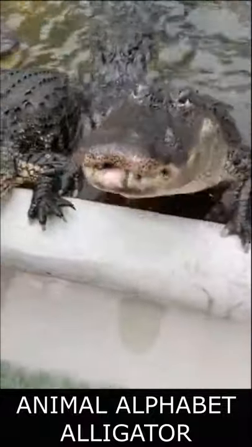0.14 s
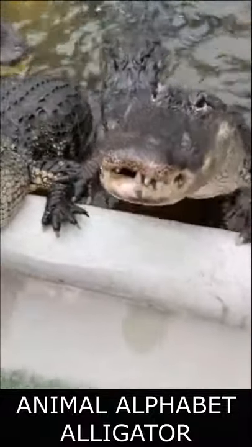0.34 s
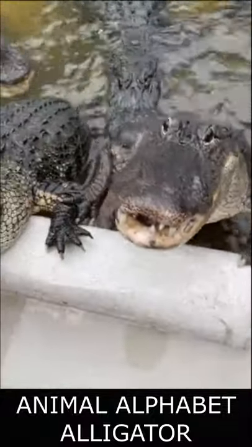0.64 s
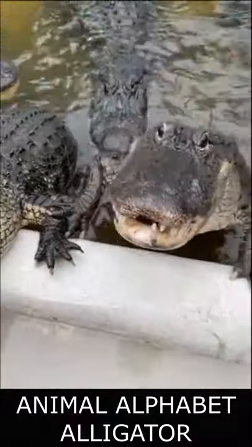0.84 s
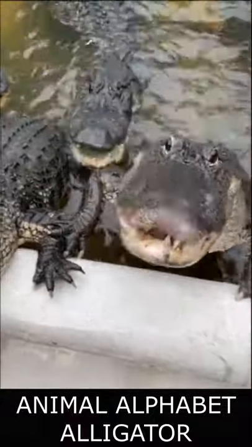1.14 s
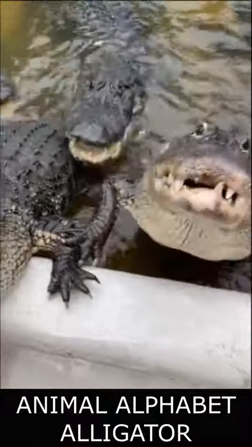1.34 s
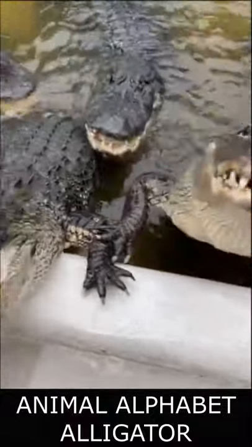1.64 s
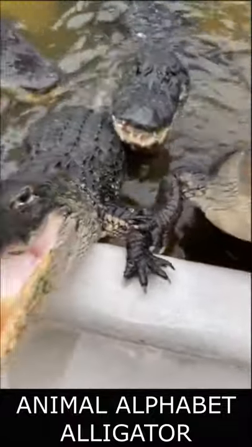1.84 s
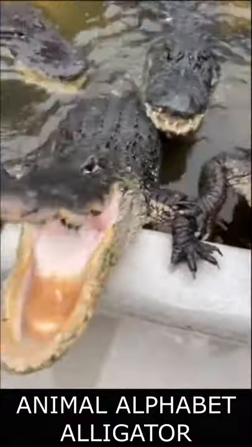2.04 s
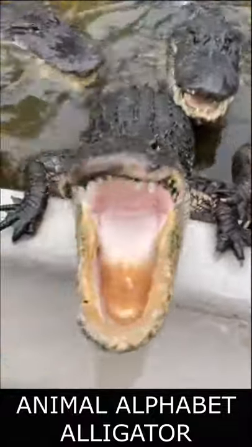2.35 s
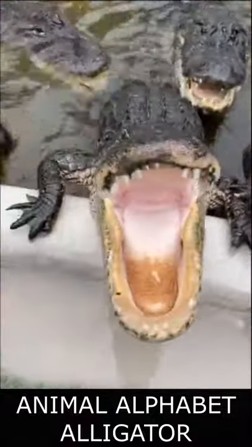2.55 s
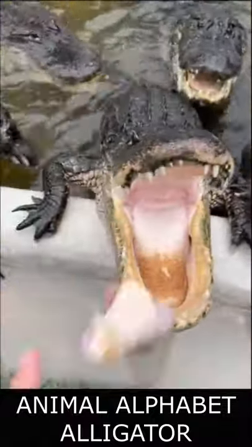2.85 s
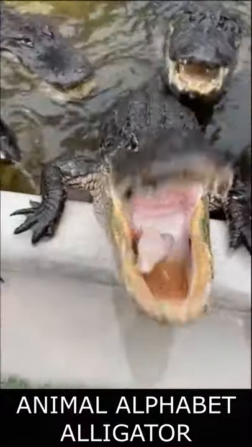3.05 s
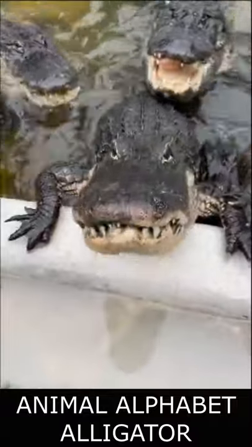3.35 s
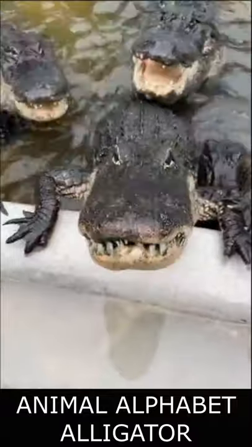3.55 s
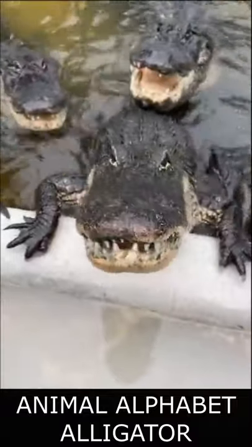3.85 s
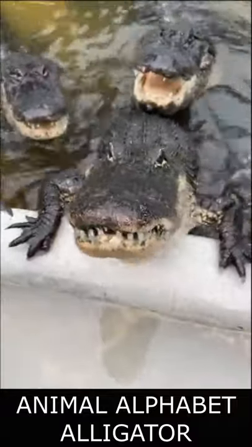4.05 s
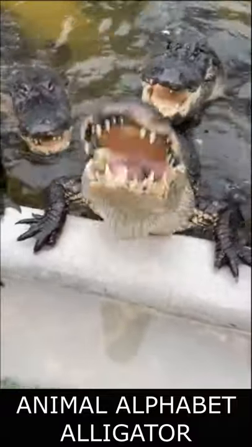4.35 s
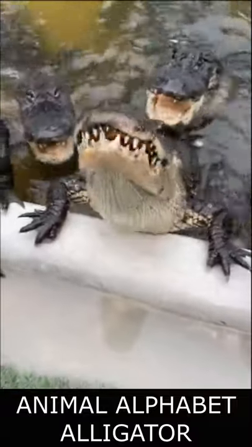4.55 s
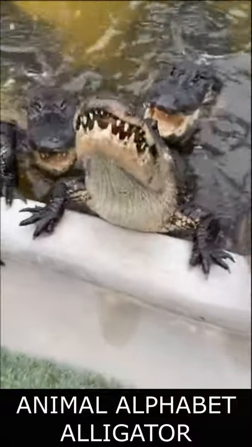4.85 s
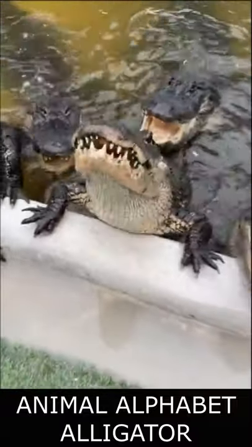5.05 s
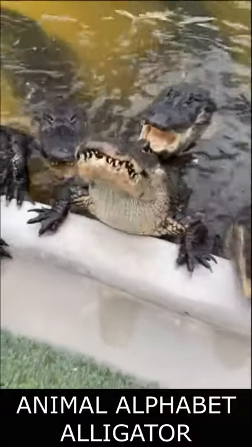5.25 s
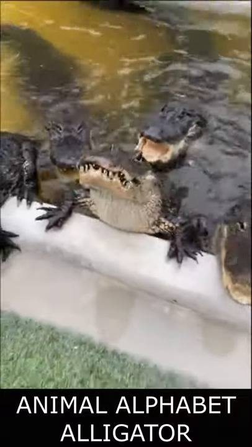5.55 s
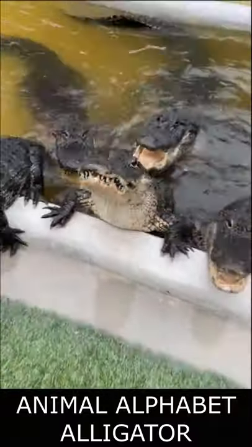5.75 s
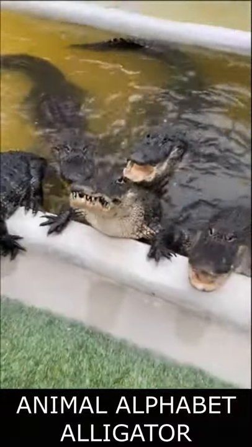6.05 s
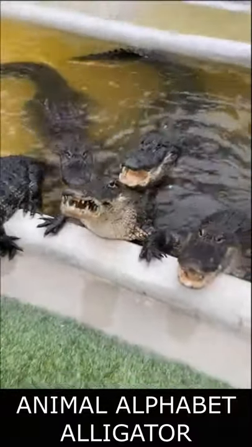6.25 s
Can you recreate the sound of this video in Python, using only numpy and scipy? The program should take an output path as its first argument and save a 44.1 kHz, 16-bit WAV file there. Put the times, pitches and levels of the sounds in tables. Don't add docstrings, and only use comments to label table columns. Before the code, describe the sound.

Alligator jaws snap shut twice with toothy cracks, followed by busy sloshing, dripping and bubbling at a pond edge, faint bird whistles far off.

```python
import sys
import numpy as np
from scipy import signal
from scipy.fft import rfft, irfft, next_fast_len
from scipy.io import wavfile
from scipy.ndimage import uniform_filter1d, minimum_filter1d

SR = 44100
rng = np.random.default_rng(int(sys.argv[2]) if len(sys.argv) > 2 else 0)


def unload_wav(signal):
    wavfile.write(
        sys.argv[1],
        SR,
        np.round(np.clip(np.atleast_2d(signal).T, -1, 1) * 32767).astype(np.int16),
    )


def gain_from_db(level_db):
    decades = np.asarray(level_db, float) / 20
    return 10 ** decades


N = 282681

# (frequency [Hz], density [dB per Hz])
SPRAY = [(880, -2.5), (1500, -3), (2410, -6), (4500, -5.5), (4820, -4), (5220, -4), (7030, -3),
         (8570, -7.5), (9000, -22.5), (9840, -6), (11000, -0.5), (12700, -13), (16000, -43)]
# (time [s], peak level [dB], pitch [Hz])
DRIPS = [(0.748, -32, 2370), (1.012, -29, 1368), (1.334, -25, 2430), (1.47, -23, 1270),
         (1.608, -27.5, 1960), (1.699, -28.5, 2480), (1.832, -25, 1830), (1.892, -23, 1310),
         (1.912, -28, 1280), (1.942, -15, 1210), (2.097, -22, 2580), (2.236, -32, 2260), (2.418, -33, 1440),
         (2.722, -32, 1340), (3.154, -29.5, 2550), (3.408, -23.5, 2300), (3.43, -19, 2120),
         (3.576, -24, 1270), (3.659, -21.5, 1720), (3.696, -23, 2420), (3.914, -33, 2160),
         (4.198, -23, 1346), (4.339, -25, 1270), (4.486, -33, 1575), (5.493, -25.5, 1530),
         (5.597, -29.5, 1590), (5.83, -32, 1580), (5.883, -30, 1400), (6.062, -28, 1660)]


def jaw_claps():
    # (time [s], level [dB], pitch at closing [Hz], settled pitch [Hz], t60 [s])
    hollows = [
        (0.0012, -23, 120, 121, 0.13),
        (.0185, -22.5, 930, 610, 0.021),
        (.04, -20, 1180, 950, 0.042),
        (0.0375, -3, 756, 243, 0.044),
        (.039, -7.5, 100, 149, 0.041),
        (0.3048, -16, 438, 550, 0.021),
        (0.3054, -16, 506, 760, 0.036),
        (0.324, -16.5, 544, 258, 0.042),
    ]
    # (time [s], level [dB], rise [s], t60 [s], centre frequency [Hz])
    cracks = [(0.0, -34, .002, 0.19, 5000), (0.015, -16, .0015, 0.029, 6860),
              (0.0159, -13.5, 0.0012, 0.041, 1580), (0.22, -30.5, 0.0014, 0.024, 3200),
              (0.324, -31, 0.021, 0.28, 2140), (0.021, -19, 0.0086, 0.056, 9000),
              (0.0369, -7, 0.0003, 0.0058, 8500), (0.038, -10.5, 0.00094, 0.023, 11400),
              (.299, -30, .001, 0.022, 2500), (0.302, -11.5, 0.00062, 0.019, 5700),
              (0.302, -16, 0.0006, 0.029, 1820), (0.3215, -10, 0.0012, 0.019, 4270)]
    # (frequency [Hz], gain [dB])
    port_colour = [(2500, 0.5), (4500, -5), (7000, 0.5), (9000, -6), (11000, 5), (12800, -4), (14800, -19)]
    jaws = np.zeros((2, N))
    for s, *ring in hollows:
        add(jaws, s, hollow(*ring))
    for s, *burst in cracks:
        add(jaws, s, crack(*burst))
    return colour(jaws, port_colour) * gain_from_db(np.array([[-.2], [.2]]))


def hollow(db, start_hz, end_hz, t60):
    t = np.arange(round(.25 * SR)) / SR
    hz = end_hz + (start_hz - end_hz) * np.exp(-t / 0.0025)
    rise = 1 - np.exp(-t * start_hz / 0.16)
    return gain_from_db(db - 60 * (t / t60) ** 1.35) * rise * np.sin(2 * np.pi * np.cumsum(hz) / SR)


def crack(db, rise, t60, hz, froth=0):
    t = np.arange(round(max(.05, .6 * t60) * SR)) / SR
    rough = rng.standard_normal(len(t)) + np.resize(froth, len(t))
    noise = evened(band(rough, hz / 2.97, min(hz * 1.45, 13000)))
    fade_out = signal.windows.tukey(2 * len(t), .3)[len(t):]
    return gain_from_db(db - 3.0 - 60 * t / t60) * (1 - np.exp(-t / rise)) * noise * fade_out


def splashes():
    # (time [s], level [dB], rise [s], t60 [s], centre frequency [Hz])
    sheets = [(.05, -30, 0.015, 0.69, 150), (.33, -27.5, 0.011, 0.39, 330), (.95, -34.5, 0.094, 0.87, 440),
              (2.52, -34, 0.027, 0.41, 3500), (2.8, -39.5, 0.065, 0.51, 290), (2.3, -36.5, 0.11, 1.13, 520),
              (3.85, -36.5, 0.056, 0.57, 380), (4.4, -33.5, .04, 0.6, 320), (4, -35, .03, 0.65, 310),
              (4.88, -31.5, .04, 0.59, 1170), (.5, -35, 0.045, 0.86, 480), (1.96, -24, 0.018, 0.27, 400),
              (4.114, -19.5, 0.014, 0.38, 730), (4.345, -25.5, 0.069, 0.47, 6500),
              (4.971, -32.5, 0.035, 0.43, 650), (3.53, -28, 0.025, 0.55, 1080), (4.6, -33, 0.06, 0.71, 300),
              (5.8, -34, 0.029, 0.55, 1300), (1.78, -33.5, 0.034, 0.67, 2200),
              (3.8382, -17, .0005, .016, 3300), (3.8445, -22, .0015, .03, 3100),
              (3.832, -24, .001, .016, 1700), (3.298, -23, .002, .045, 4300)]
    # (time [s], peak level [dB], burst t60 [s], level under 3 kHz [dB])
    slaps = [(0.7472, -30, 0.043, -25), (1.26, -24, 0.021, 7), (1.3701, -28.5, 0.2, 2.5),
             (1.4313, -22.5, 0.18, -17), (1.47, -21.5, 0.03, -19), (1.595, -27, 0.036, -1),
             (1.7235, -22.5, 0.064, -20), (1.7897, -25, 0.25, -5), (1.8687, -18.5, 0.049, -25),
             (1.962, -28, 0.08, 9), (1.9895, -14, 0.03, 3.5), (2.17, -27.5, 0.029, -22),
             (2.3431, -19.5, 0.012, 2.5), (2.9972, -23, 0.019, 4.5), (3.0304, -29.5, 0.13, -1),
             (3.101, -25, 0.047, -19), (3.1356, -24.5, 0.052, -14), (3.2997, -20, 0.036, -15.5),
             (3.5343, -27.5, 0.42, 3.5), (3.67, -22.5, 0.093, 1.5), (3.8388, -18, 0.02, 1),
             (4.0414, -31, 0.25, 4.5), (4.1918, -24.5, 0.034, 3), (4.2092, -23.5, 0.083, 5),
             (5.2815, -33, 0.033, 7.5), (5.37, -23.5, 0.03, -27), (5.9102, -16.5, 0.048, -32),
             (5.9936, -20.5, 0.066, -16), (6.066, -19, 0.023, 3), (6.284, -27, 0.074, -9)]
    # (time [s], peak level [dB], level under 3 kHz [dB])
    flecks = [(0.2004, -39, -8), (0.4299, -28, -12), (0.5048, -33, -12), (0.614, -27, -11),
              (0.9597, -33, -7), (1.1772, -28, -2), (1.222, -31, 1), (1.5773, -22.5, -7),
              (1.8176, -23, -10), (1.8347, -14.5, -9), (1.9415, -21, -3), (2.007, -22, -3),
              (2.2697, -37, -12), (2.3141, -29, 0), (2.4488, -27, -15), (2.5903, -23, -11),
              (3.047, -22, -6), (3.263, -31, 0), (3.313, -30, -11), (3.334, -30, -10), (3.495, -32, 3),
              (3.6326, -29, 5), (3.7948, -30, -11), (3.8314, -21, -1), (3.9162, -24, -7),
              (3.9679, -26, -12), (4.2403, -25, -12), (4.2986, -35, -4), (4.4855, -20, -7),
              (4.6209, -27, -6), (4.781, -28, -11), (5.353, -28, -12), (5.5722, -28, -10),
              (6.0174, -26, -5), (6.0432, -21, -8), (6.2687, -34, -13)]
    water = np.zeros((2, N))
    froth = 0.4 * swarm(339.3, 3450, 1200, 4.4, 3.4, count=10)
    for s, *burst in sheets:
        add(water, s, crack(*burst, froth=froth[round(s * SR):]))
    for s, *burst in slaps:
        add(water, s - .001, slap(*burst))
    for s, db, low_db in flecks:
        add(water, s - .001, slap(db - 4, t60=0.033, low_db=low_db - 2))
    for s, db, _ in DRIPS:
        add(water, s - .002, slap(db - 8, t60=.014, low_db=6.0))
    return water


def slap(db, t60, low_db):
    t = np.arange(round(.15 * SR)) / SR
    noise = rng.standard_normal((3, len(t)))
    high = evened(colour(noise[0] + 0.14 * np.array([noise[1], -noise[1]]), SPRAY))
    low = evened(band(noise[2], 690, 3000))
    tick = 1.3 * gain_from_db(-60 * t / 0.018)
    shape = (gain_from_db(-60 * t / max(t60, .005)) + tick) * (1 - np.exp(-t / 0.0015))
    return gain_from_db(db - 10.5) * shape * (high + gain_from_db(low_db) * low)


def trapped_bubbles():
    # (time [s], peak level [dB], pitch [Hz], length [cycles], pitch rise [share])
    gulps = [(0.989, -31, 326, 10.3, 0.67), (1.258, -32, 129, 3.9, 0.2), (1.374, -26, 550, 1.5, -0.12),
             (1.74, -31, 291, 11, 0.47), (1.9945, -15.5, 140, 5, 0.5), (2.014, -16, 308, 3.8, 0.087),
             (3.167, -31.5, 205, 3.2, 0.27), (3.538, -24, 570, 7, -0.1), (3.524, -24.5, 900, 15, .4),
             (3.87, -26.5, 267, 3.2, 0.88), (4.124, -24, 135, 3, 0.1), (4.118, -28, 530, 4, 0.5),
             (4.186, -24, 343, 7.7, 0.19), (4.413, -14, 975, 12.6, 0.23), (4.79, -25, 254, 5.9, 0.29),
             (4.809, -27.5, 228, 7, 0.86), (4.827, -23.5, 370, 7.7, 0.07), (.829, -31, 880, 24, -.07),
             (1.579, -24, 734, 10.8, -0.094), (3.002, -19.5, 847, 11.6, -0.07),
             (3.067, -26.5, 550, 2.2, -0.0033), (3.354, -37, 582, 16, -0.064), (1.386, -24, 270, 2.2, .1),
             (2.68, -37.5, 340, 6, 0.14), (1.09, -36, 734, 17, -0.02), (2.107, -34, 130, 3, 0.16),
             (4.292, -31, 363, 4.3, .2), (4.995, -33, 420, 5.5, 0.37), (4.222, -30, 330, 7, .15),
             (4.452, -29, 190, 4, .2)]
    # (time [s], peak level [dB], pitch [Hz])
    plops = [(0.409, -29, 670), (1.178, -35, 827), (1.275, -22, 1137), (1.356, -33, 997),
             (1.76, -27.5, 947), (1.872, -29, 820), (1.964, -26, 530), (1.989, -17, 910),
             (2.022, -26, 1010), (2.342, -30, 950), (2.376, -15.5, 770), (2.4, -33, 707),
             (2.797, -36, 1140), (2.887, -32.5, 735), (3.859, -25, 986), (4.123, -19, 600),
             (4.133, -24.5, 940), (4.16, -22.5, 627), (2.765, -31, 1110), (4.926, -27, 950),
             (5.459, -36, 433), (5.46, -30.5, 966), (5.978, -29.5, 1126)]
    # (time [s], peak level [dB], pitch [Hz])
    blips = [(0.56, -34, 480), (0.638, -34, 641), (1.833, -32, 977), (2.237, -36, 886), (2.28, -36, 700),
             (2.589, -40, 530), (2.614, -34, 860), (2.949, -35, 1000), (3.432, -35, 630),
             (3.499, -34.5, 595), (3.576, -28.5, 668), (3.648, -35, 579), (3.729, -36, 930),
             (3.914, -32, 966), (4.038, -33, 594), (4.082, -31, 635), (4.2, -29.5, 553), (4.261, -34, 525),
             (4.722, -34, 619), (4.956, -29, 950), (5.036, -30.5, 896), (5.281, -34.5, 597),
             (5.807, -35, 684), (6.022, -32, 880), (6.147, -38, 929),
             (0.5965, -33, 2420), (0.7203, -39, 1430), (0.9193, -38, 2450), (1.2251, -35, 1170),
             (1.3567, -26, 2370), (1.429, -31, 1370), (1.454, -30, 1320), (1.734, -31, 1550),
             (1.787, -26, 2670), (1.8745, -28, 1310), (1.964, -23, 2240), (2.0203, -25, 1460),
             (2.5526, -29, 2700), (2.5835, -32.5, 1420), (2.9342, -33, 1370), (3.1298, -29, 2410),
             (3.2335, -35, 2650), (3.4526, -26, 2350), (3.6112, -28, 1720), (3.7064, -28, 1630),
             (3.7747, -31, 2580), (3.924, -27, 2120), (3.9463, -31, 2360), (3.9679, -34, 1410),
             (4.0455, -34, 1850), (4.0951, -30, 1250), (4.2214, -23, 2130), (4.236, -27, 2310),
             (4.2931, -30, 2430), (4.3564, -27, 2430), (4.429, -25.5, 2200), (4.6219, -31.5, 2380),
             (4.8334, -29, 1630), (4.9043, -32, 1210), (5.1272, -35.5, 1390), (5.3007, -32.5, 2400),
             (5.3537, -31.5, 2520), (5.5254, -34, 2720), (5.7635, -32.5, 1170), (5.851, -30, 1710),
             (6.07, -29, 1660), (6.2836, -33, 2250)]
    hard_db, hard_cycles, cycles_per_db, cycles_per_khz = -20, 6.8, 0.55, 0.9
    placed = list(gulps)
    for s, db, hz in plops + DRIPS:
        cycles = hard_cycles + cycles_per_db * (hard_db - db) + cycles_per_khz * hz / 1000
        placed.append((s, db, hz, cycles))
    for s, db, hz in blips:
        placed.append((s, db, hz, 8.2 + cycles_per_khz * hz / 1000, .08))
    water = np.zeros((2, N))
    for s, db, *size in placed:
        pan_db = rng.normal(-.5, 2.6) * min(size[0] / 900, 1)
        gain = gain_from_db(db - 3.5 + pan_db * np.array([[.5], [-.5]]))
        add(water, s - .0015, gain * bubble(*size))
    return water


def bubble(hz, cycles, rise=0.11):
    u = np.linspace(0, 1, int(max(cycles, 1.5) * 1.606 / hz * SR))
    shape = (1 - np.exp(-u / .2)) ** 1.6 * np.exp(-3.8 * u) * (1 - u ** 4)
    phase = 2 * np.pi * np.cumsum(hz * (1 + rise * (2 * u - .4))) / SR
    return shape / shape.max() * np.sin(phase)


def air_pockets():
    # (time [s], length [s], first pitch [Hz], last pitch [Hz], level [dB])
    pockets = [(.125, .055, 215, 190, -37), (0.198, .035, 640, 700, -48), (.248, 0.04, 830, 900, -48),
               (.345, 0.077, 268, 196, -34), (0.518, 0.18, 213, 319, -38), (.58, 0.27, 164, 262, -41),
               (.956, 0.041, 466, 523, -42), (1.012, 0.037, 1250, 2060, -36.5),
               (1.033, 0.072, 484, 758, -45.5), (1.372, .055, 590, 530, -33.5),
               (4.551, .056, 180, 430, -29), (4.597, 0.022, 385, 420, -24), (4.655, .03, 170, 380, -32),
               (5.406, .046, 278, 261, -33), (5.441, 0.047, 310, 660, -35), (5.478, 0.05, 770, 740, -37),
               (5.776, .045, 380, 640, -38), (6.306, .035, 690, 876, -41), (2.728, .045, 780, 1200, -45.5),
               (2.862, .035, 400, 780, -41), (2.893, .05, 780, 1420, -45), (2.952, .04, 1080, 720, -44),
               (1.148, .035, 520, 820, -43)]
    water = np.zeros((2, N))
    for row in pockets:
        add(water, *pocket(*row))
    return water


def pocket(s, length, first_hz, last_hz, db):
    u = np.linspace(0, 1, num=9)
    hz = first_hz * (last_hz / first_hz) ** u
    level_db = db - 15 * abs(u - 0.13)
    return glide(np.transpose([s + length * u, hz, level_db]), wobble=0.039, flutter_db=3.0)


def spray(surge):
    flicker = gain_from_db(2.24 * surge + 1.77 * evened(uniform_filter1d(rng.standard_normal(N), 90)))
    drops = swarm(1802, 13700, 2500, 5.4, 4.5, count=14)
    mix = evened(rng.standard_normal((2, N))) + .55 * np.array([drops, np.roll(drops, 900)])
    z = signal.stft(mix * flicker, nperseg=256)[2]
    patches = uniform_filter1d(rng.standard_normal(z.shape[1:]), 9, 0)
    patches = evened(uniform_filter1d(patches, 10, 1))
    mix = colour(signal.istft(z * gain_from_db(3.32 * patches), nperseg=256)[1][:, :N], SPRAY)
    return gain_from_db(stir(1) + 5.5) * evened(widen(*mix))


def gurgle(surge):
    wash = rng.standard_normal((2, N))
    small = swarm(641.6, 3890, 800, 8.9, 4.15, count=20) + 0.77 * evened(band(wash[0], 740, 3540))
    large = swarm(139, 694, 150, 5.9, 4.3, count=16) + .5 * evened(band(wash[1], 86, 650))
    small_db = stir(1) + stir(2) - 0.5
    calm_db, slosh_db = -46, -54
    large_db = slosh_db + 0.22 * (stir(1) - calm_db) + 0.59 * stir(2) - 4.0
    x = gain_from_db(small_db) * evened(small * gain_from_db(1.6 * surge))
    x += gain_from_db(large_db) * evened(large * gain_from_db(2.9 * surge))
    return widen(x, np.roll(x, 700))


def swarm(low_hz, high_hz, per_s, cycles, spread_db, count=24):
    out = np.zeros(N)
    slots = N // 8
    for hz in np.geomspace(low_hz, high_hz, count):
        chance, luck = rng.random((2, slots))
        clump = np.repeat(np.minimum(rng.exponential(1, N // 2048 + 1), 2.4), 256)[:slots]
        born = chance < clump * per_s / count / SR * 8
        size = np.zeros(N)
        where = np.arange(slots) * 8 + rng.integers(0, 8, slots)
        size[where] = gain_from_db(spread_db * np.minimum(-np.log(luck + 1e-9), 3.0)) * born
        ring = bubble(hz, cycles * rng.uniform(0.63, 2.25), rng.uniform(-0.047, 0.3))
        out += signal.oaconvolve(size, ring)[:N]
    return evened(out)


def stir(column):
    # (time [s], surface stirring [dB], trapped air above it [dB])
    stirring = [(0.08, -62, -2), (0.28, -59, 4), (0.32, -48, 5.5), (0.77, -55, 2), (1.2, -52.5, 4.5),
                (1.45, -42, -11), (1.69, -49, 3), (1.97, -39.5, 4), (2.19, -48, 2.5), (2.8, -54, 6),
                (3.1, -47.5, 2), (4.3, -42.5, 0.5), (4.58, -50, -2.5), (4.9, -45, 4.5), (5.14, -51, 4.5),
                (5.68, -50.5, 2.5), (5.95, -46.5, 4), (6.41, -51.5, -11)]
    table = np.transpose(stirring)
    return np.interp(np.arange(N) / SR, table[0], table[column])


def lapping():
    return evened(uniform_filter1d(uniform_filter1d(rng.standard_normal(N), 500), 300))


def lull():
    # (middle time [s], half width [s], depth [dB])
    lulls = [(.68, .03, -2.5), (.8, .03, -1.5), (1.14, .03, -4), (1.24, .016, -5.5), (1.55, 0.034, -2.5),
             (2.72, 0.064, -1.5), (3.275, .022, -7), (3.465, 0.026, -2), (3.82, .014, -2),
             (4.28, 0.024, -4.5), (3.365, .024, -5), (4.68, 0.059, -2), (5.05, .04, -3.5),
             (5.24, 0.027, -5), (5.51, 0.027, -4), (5.72, 0.045, -3.5), (6.23, 0.036, -2.5)]
    t = np.arange(N) / SR
    return gain_from_db(sum(db * np.exp(-((t - s) / half) ** 2) for s, half, db in lulls))


def walls(x):
    t = np.arange(round(.15 * SR)) / SR
    tail = rng.standard_normal((2, len(t))) * gain_from_db(-60 * t / 0.16) * (t > .004)
    tail += 0.89 * tail[::-1]
    return signal.oaconvolve(x, tail / np.linalg.norm(tail[0]), axes=1)[:, :N]


def far_bird():
    # (time [s], length [s], first pitch [Hz], level [dB], unsteadiness [share])
    calls = [
        (2.009, .24, 3520, -41, 0.021),
        (5.554, 0.034, 5110, -46, .02),
        (5.567, .27, 3570, -40.5, 0.0095),
    ]
    far = np.zeros((2, N))
    for row in calls:
        add(far, *whistle(*row))
    return far


def whistle(s, length, first_hz, db, wobble):
    t = np.linspace(0, length, num=30)
    rest_hz, settle_s = 2770, .09
    hz = rest_hz + (first_hz - rest_hz) * np.exp(-t / settle_s)
    level_db = db - 11.5 * (t / length) ** 2
    return glide(np.transpose([s + t, hz, level_db]), wobble, flutter_db=3.0)


def rumble():
    # (frequency [Hz], density [dB per Hz])
    drone_spectrum = [(12, -42), (20, -42.5), (48, 4.5), (73, 9), (93, 1.5), (208, -10.5), (400, -30),
                      (520, -62), (880, -120)]
    return gain_from_db(-41) * evened(colour(rng.standard_normal(N), drone_spectrum))


def glide(rows, wobble, flutter_db):
    s, hz, db = np.transpose(rows)
    t = np.arange(s[0], s[-1], 1 / SR)
    drift, flutter = evened(uniform_filter1d(rng.standard_normal((2, len(t))), 200))
    smooth_hz = uniform_filter1d(np.interp(t, s, hz), 300, mode="nearest")
    tone = np.sin(2 * np.pi * np.cumsum(smooth_hz * (1 + wobble * drift)) / SR)
    level = np.sqrt(2) * gain_from_db(np.interp(t, s, db) + flutter_db * flutter)
    return s[0], level * tone * signal.windows.tukey(len(t), .15)


def widen(x, other):
    # (frequency [Hz], left-right likeness [share])
    likeness = [(60, 0.99), (130, 1.0), (290, 0.98), (640, 0.92), (1410, 1), (2400, 0.91), (3600, 0.66),
                (6820, 0.46), (15000, 0.63)]
    size = next_fast_len(N)
    same = np.clip(read(likeness, np.fft.rfftfreq(size, 1 / SR)), 0, 1)
    mid = rfft(x, size) * np.sqrt((1 + same) / 2)
    side = rfft(other, size) * np.sqrt((1 - same) / 2)
    return irfft(np.array([mid + side, mid - side]), size)[:, :N]


def evened(x):
    return x / np.sqrt(np.mean(x ** 2) + 1e-20)


def read(points, hz):
    f, value = np.transpose(points)
    return np.interp(np.log(hz + 1), np.log(f + 1), value)


def add(mix, s, sound):
    part = mix[..., round(s * SR):][..., :sound.shape[-1]]
    part += sound[..., :part.shape[-1]]


def band(x, low_hz, high_hz, order=2):
    sos = signal.butter(order, [low_hz, min(high_hz, .45 * SR)], "bandpass", fs=SR, output="sos")
    return signal.sosfilt(sos, x)


def colour(x, points):
    size = next_fast_len(x.shape[-1])
    gain = gain_from_db(read(points, np.fft.rfftfreq(size, 1 / SR)))
    return irfft(rfft(x, size) * gain, size)[..., :x.shape[-1]]


def scene():
    jaws = jaw_claps()
    water = splashes() + trapped_bubbles() + air_pockets()
    far = far_bird()
    surge = lapping()
    beds = lull() * (spray(surge) + gurgle(surge)) + rumble()
    echoes = walls(gain_from_db(-17.0) * jaws + gain_from_db(-9.0) * water + gain_from_db(-7.0) * far)
    return jaws + water + echoes + far + beds


def thin_treble(z, hz, level_db):
    # (low edge [Hz], high edge [Hz])
    thin_bands = [(4760, 4920), (8560, 9100), (9100, 9720), (12300, 13200), (13200, 14600), (14600, 15900),
                  (15900, 22050)]
    frames = len(level_db)
    jump_db = -minimum_filter1d(uniform_filter1d(level_db, 60) - level_db, 3)
    needs_db = (-.6, 4.2, 4.6, -3.5, 3.6, 7, 60)
    open_db = (-9, 1.1, 1.1, -3, 0.5, -18.0, 0)
    for (low, high), need, kept_db in zip(thin_bands, needs_db, open_db):
        whim = np.repeat(rng.normal(0, 1.8, frames), 3)[:frames]
        z[:, (hz > low) & (hz < high)] *= np.where(jump_db + whim > need, gain_from_db(kept_db), gain_from_db(-50))
    luck = rng.random((len(hz) // 4 + 1, frames // 6 + 1))
    luck = np.kron(luck, np.ones((4, 6)))[:len(hz), :frames]
    dip_chance = np.where(hz > 13200, .3, .03 * (hz > 3000))[:, None]
    return z * np.where(luck < dip_chance, gain_from_db(-30), 1)


def thin_tones(t, level_db):
    # (frequency [Hz], level [dB])
    tone_levels = [(8441, -63.5), (9819, -65)]
    time = np.arange(N) / SR
    out = np.zeros(N)
    for f, db in tone_levels:
        present = np.repeat(rng.random(len(t)) < .85, 16)[:len(t)]
        strength = present * gain_from_db(np.minimum(level_db - level_db.mean(), 4) + 4)
        out += gain_from_db(db) * np.interp(time, t, strength) * np.sin(2 * np.pi * f * time)
    return out


def top_cut(x):
    return signal.sosfilt(signal.butter(12, 16130, fs=SR, output="sos"), x)


def record(dry):
    # (frequency [Hz], left over right [dB])
    port_lean = [(60, 0.15), (180, -0.37), (550, -1.5), (1650, -0.22), (4970, -0.67), (15000, 0.096)]
    hz, t, z = signal.stft(dry, SR, nperseg=1024)
    z *= gain_from_db(read(port_lean, hz)[:, None] * np.array([.5, -.5])[:, None, None])
    level_db = 10 * np.log10((abs(z[:, hz > 7000]) ** 2).mean((0, 1)) + 1e-14)
    z = thin_treble(z, hz, level_db)
    mix = signal.istft(z, SR, nperseg=1024)[1][:, :N] + thin_tones(t, level_db)
    return top_cut(mix)


dry = scene()
out = record(dry)
unload_wav(out)
```